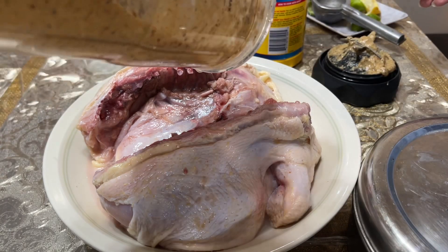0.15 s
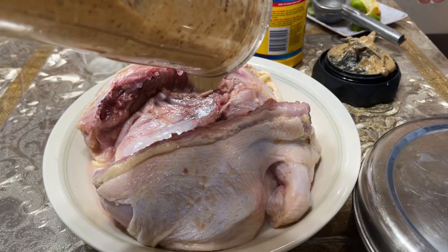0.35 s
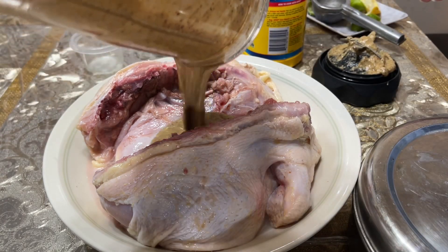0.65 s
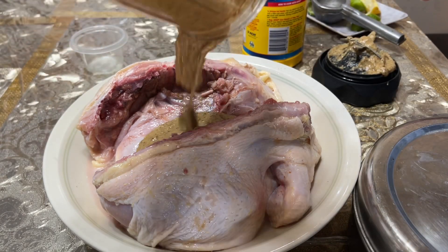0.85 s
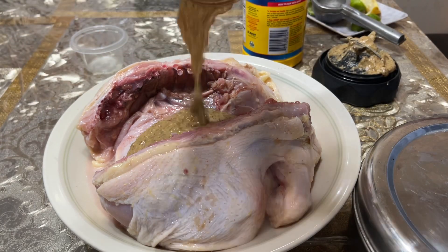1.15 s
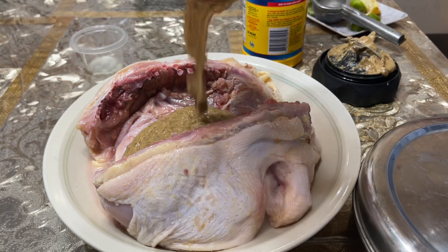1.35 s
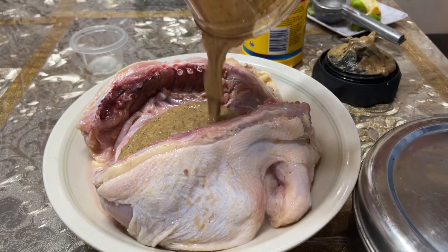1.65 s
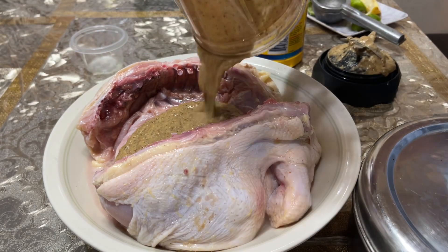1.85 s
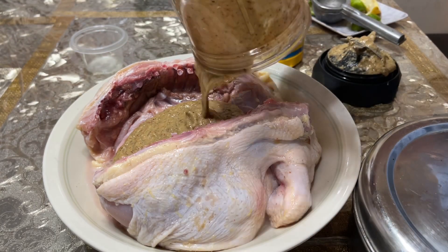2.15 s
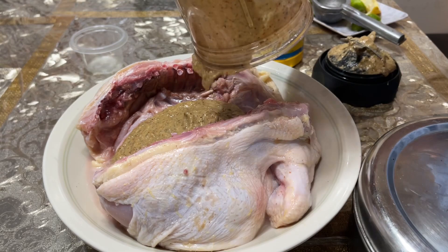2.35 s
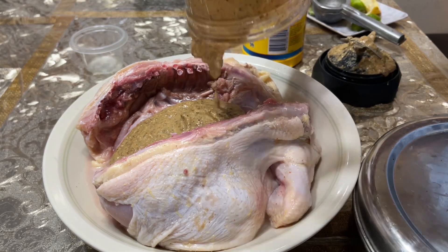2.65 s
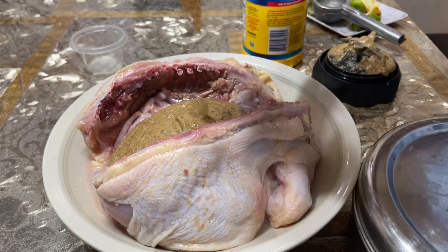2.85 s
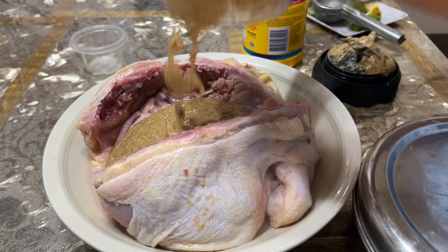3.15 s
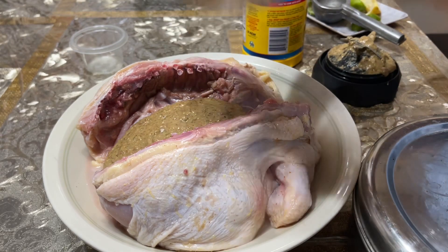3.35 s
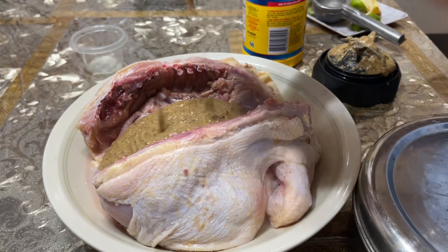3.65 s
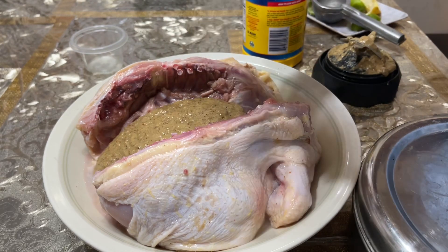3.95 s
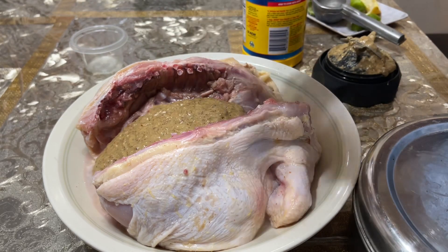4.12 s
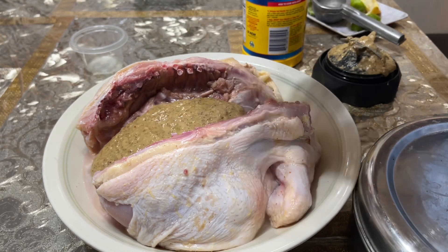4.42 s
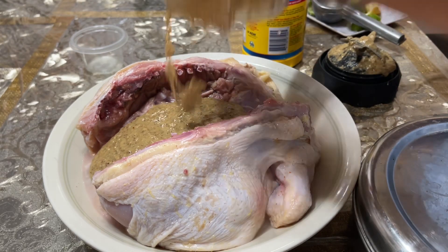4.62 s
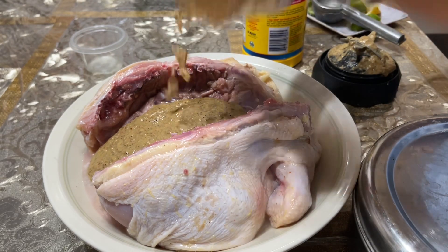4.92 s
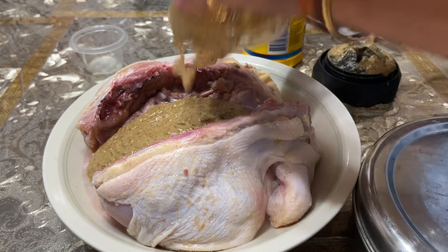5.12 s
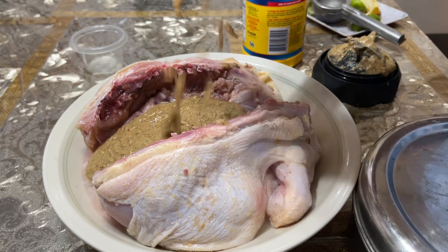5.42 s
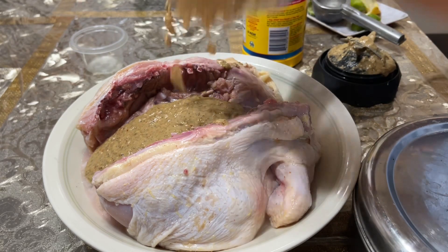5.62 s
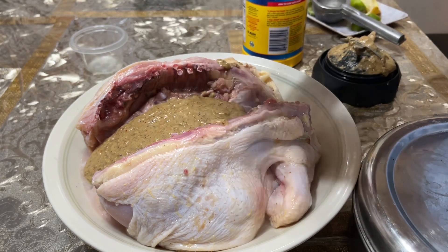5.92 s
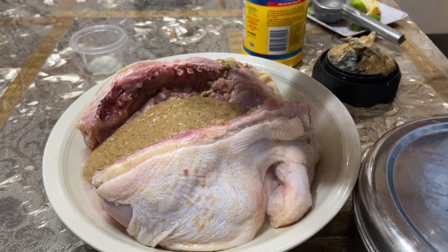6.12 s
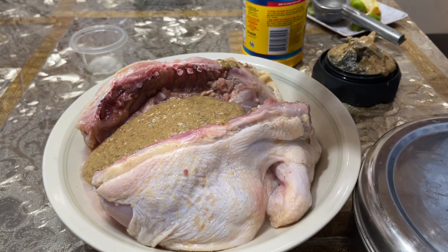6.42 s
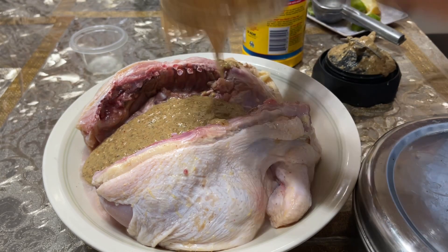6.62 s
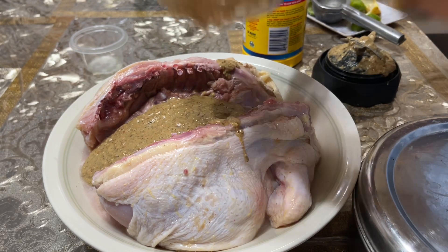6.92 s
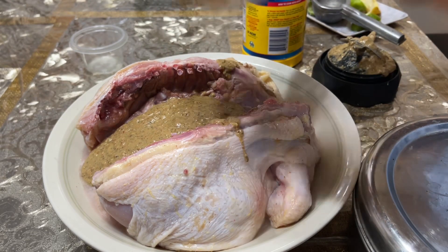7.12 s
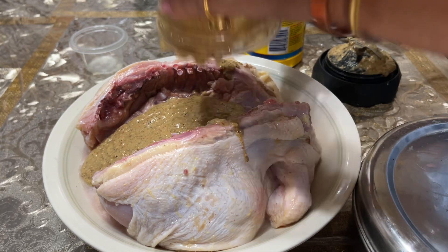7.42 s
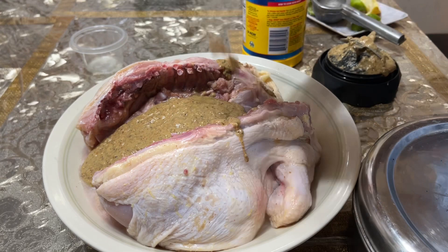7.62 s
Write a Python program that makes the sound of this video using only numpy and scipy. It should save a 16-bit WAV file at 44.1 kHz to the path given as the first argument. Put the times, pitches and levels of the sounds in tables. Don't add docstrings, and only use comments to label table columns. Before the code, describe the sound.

Wet paste ticks and a distant door thud, then bright glassy clinks and short scrapes in a jar, over fridge hum and passing traffic.

```python
import sys
import numpy as np
from scipy import signal
from scipy.fft import rfft, irfft, next_fast_len
from scipy.io import wavfile
from scipy.ndimage import uniform_filter1d

SR = 44100
rng = np.random.default_rng(int(sys.argv[2]) if len(sys.argv) > 2 else 0)


def natural_amplitude(level_db):
    exponent = np.asarray(level_db, float) / 20
    return 10 ** exponent


def bounce(signal):
    frames = np.transpose(np.atleast_2d(signal))
    limited = np.clip(frames, -1, 1)
    pcm = np.round(limited * 32767).astype(np.int16)
    wavfile.write(sys.argv[1], SR, pcm)


N = 342657


def evened(x):
    return x / np.sqrt(np.mean(x ** 2) + 1e-20)


def read(points, hz):
    f, value = np.transpose(points)
    return np.interp(np.log(hz + 1), np.log(f + 1), value)


def curve(rows):
    s, *columns = np.transpose(rows)
    return [np.interp(np.arange(N) / SR, s, column) for column in columns]


def add(mix, s, sound):
    part = mix[..., round(s * SR):][..., :sound.shape[-1]]
    part += sound[..., :part.shape[-1]]


# (frequency [Hz], likeness [0 to 1])
LIKENESS = [(60, 0.96), (150, 0.97), (380, 0.33), (950, 0.11), (2400, 0.27), (5500, 1), (7600, 0.083),
            (15000, 0.7)]
# (frequency [Hz], left over right [dB])
LEFT_LEAN = [(60, 1), (550, 1.5), (1650, 1.5), (5000, 6), (7800, 3.5), (15000, -3.5)]


def noise(spectrum, patchy_db):
    frames, hz = N // 512 + 5, np.fft.rfftfreq(2048, 1 / SR)
    a, b, c, d, patches = rng.standard_normal((frames, 1025, 5)).T
    patches = evened(uniform_filter1d(uniform_filter1d(patches, 12, 0), 8, 1))
    same = np.clip(read(LIKENESS, hz), -1, 1)[:, None]
    left, own = a + 1j * b, c + 1j * d
    right = natural_amplitude(-read(LEFT_LEAN, hz))[:, None] * (same * left + np.sqrt(1 - same ** 2) * own)
    z = np.array([left, right]) * natural_amplitude(read(spectrum, hz)[:, None] + patchy_db * patches)
    return evened(signal.istft(z, nperseg=2048, noverlap=1536)[1][:, :N])


def whistle(hz, width, steady):
    slow = signal.butter(2, width, fs=SR, output="sos")
    wander = signal.sosfilt(slow, rng.standard_normal((2, N)))
    wander = steady + evened(wander[0]) + 1j * evened(wander[1])
    phase = 2 * np.pi * np.cumsum(hz * np.ones(N)) / SR
    return evened((wander * np.exp(1j * phase)).real)


def ring(modes, factor, spread_db, rise_s):
    hz, db, t60 = np.transpose(modes)[:, :, None]
    t = np.arange(5000) / SR
    strength, detune, damping, beat = rng.standard_normal((4, len(modes), 1))
    db = db + spread_db * strength
    fade_s = np.minimum(t60 * factor * np.exp(0.2 * damping), 0.2)
    sines = natural_amplitude(db - 60 * t / fade_s) * np.sin(2 * np.pi * hz * (1 + 0.0026 * detune) * t)
    sines *= 1 + 0.6 * np.cos(2 * np.pi * 80 * beat * t)
    touch = (1 - np.exp(-t / rise_s)) * (0.42 + 0.31 * np.exp(-t / 0.0033))
    return sines.sum(0) * touch / np.sqrt((natural_amplitude(db) ** 2).sum())


def crack(hz, width, decay_s, rise_s):
    t = np.arange(3000) / SR
    edges = np.clip([hz - width / 2, hz + width / 2], 200, 16700)
    band = signal.butter(2, edges, "band", fs=SR, output="sos")
    burst = signal.sosfilt(band, rng.standard_normal(3500))[500:]
    burst = burst * np.exp(-t / decay_s) * (1 - np.exp(-t / rise_s))
    return burst / np.sqrt(2 * uniform_filter1d(burst ** 2, 40).max())


# (frequency [Hz], level [dB per Hz])
ROOM_COLOUR = [(20, -32), (44, -8), (86, -5.5), (182, -14.5), (388, -21.5), (760, -24), (2000, -34.5),
               (3700, -51), (9000, -46.5), (12000, -47), (12600, -67)]


def room_tone():
    return natural_amplitude(-59 - 1.0) * noise(ROOM_COLOUR, patchy_db=2.0)


# (frequency [Hz], level [dB])
FRIDGE_NOTES = [(177.6, -71), (238, -71.5), (721, -78.5), (958, -84)]


def fridge():
    return sum(natural_amplitude(db) * whistle(hz, 2.5, 3.6) for hz, db in FRIDGE_NOTES)


# (frequency [Hz], level [dB per Hz])
TYRE_COLOUR = [(100, -7), (235, -12), (422, -16.5), (602, -8.5), (829, -13.5), (956, -8.5), (1630, -20.5),
               (4990, -33.5), (7000, -34.5), (9100, -70.5)]
# (time [s], nearness [dB])
VEHICLE_NEARNESS = [
    (0, -15.5),
    (1.45, -12.5),
    (2.5, -5),
    (3.5, 0),
    (4.4, -4.5),
    (5.5, -4.5),
    (6.3, -10.5),
    (7.77, -11),
]
# (time [s], pitch [Hz], level [dB])
ENGINE_NOTE = [(0, 80.12, -60), (.45, 85.7, -60.5), (.95, 76.4, -64.5), (2.1, 84, -55.5), (2.7, 88, -58.5),
               (3.3, 75.8, -62), (3.7, 73, -57.5), (4.7, 74.5, -62), (5.5, 63, -61.5), (7.77, 58.1, -75)]


def vehicle():
    lag_s = 0.7
    near_db, = curve(VEHICLE_NEARNESS)
    late_db, = curve([(s + lag_s, db) for s, db in VEHICLE_NEARNESS])
    engine_hz, engine_db = curve(ENGINE_NOTE)
    wash = natural_amplitude(-54 + 1.344 * near_db) * noise(TYRE_COLOUR, patchy_db=2.0)
    rumble_colour = [(30, -24.5), (60, -7.0), (150, -2.5), (260, -2.0), (330, -27.5), (600, -54.5)]
    rumble = natural_amplitude(-55 + 1.2 * late_db) * noise(rumble_colour, patchy_db=2.5)
    return wash + rumble + natural_amplitude(engine_db) * whistle(engine_hz, 2.8, 0.86)


# (time [s], level [dB], length [s])
NEAR_CALLS = [(.05, -75, .03), (.18, -71.5, 0.022), (.268, -66.5, 0.019), (0.794, -67, 0.012),
              (.835, -76, 0.019), (2.0, -75, 0.058), (5.85, -77, 0.056), (6.1, -80.5, 0.033),
              (6.21, -67.5, 0.032), (6.42, -90.5, .03), (7.27, -84, 0.026), (7.4, -79, .04)]


def crickets():
    t = np.arange(N) / SR
    near = sum(natural_amplitude(db) * np.exp(-0.5 * ((t - s) / length) ** 2) for s, db, length in NEAR_CALLS)
    near = near * whistle(4935 - 140 * np.exp(-t / 0.08), 23, 0.9)
    chorus = natural_amplitude(-82) * np.array([whistle(4925, 62, 0.1), whistle(4925, 59.5, 0.1)])
    pulse = signal.sosfilt(signal.butter(2, 6.0, fs=SR, output="sos"), rng.standard_normal(N))
    chorus = chorus * natural_amplitude(1.7 * evened(pulse) - 0.6)
    return (chorus + near) * natural_amplitude([[3.0], [-3.0]])


# (time [s], level [dB], centre [Hz])
PASTE_SMACKS = [(0.1468, -62.5, 4370), (.626, -64.5, 5100), (2.6104, -48, 8850), (3.6023, -51, 8900),
                (.687, -68, 3560), (1.4901, -46, 6670), (1.5613, -41, 6270), (3.983, -58, 6400),
                (4.5149, -50.5, 6500), (5.536, -49.5, 7500), (5.981, -50.5, 5920), (6.107, -67, 6400),
                (6.265, -68, 6470), (6.5863, -52, 6400), (6.6986, -56, 7060), (7.1447, -53, 5900),
                (7.6889, -54.5, 6750)]
# (time [s], level [dB], low part [dB])
PASTE_TICKS = [(0.4383, -62, -10), (0.4447, -57.5, -23), (0.449, -52, -8.5), (0.923, -63.5, 6.5),
               (0.9254, -58, -25), (0.942, -53.5, -7), (1.0748, -57, -3), (1.0976, -46, -13),
               (1.2585, -52.5, -11), (1.3182, -53.5, -10), (1.4175, -49.5, -12), (1.431, -58, -5),
               (1.9542, -59, 6.5), (2.7783, -60, -1), (3.8654, -50, -6), (4.1175, -61.5, -15),
               (4.2742, -40, -5.5), (5.008, -51, -13), (5.041, -58.5, 5.5), (5.79, -55, -15),
               (5.82, -62, -17), (6.72, -61, -20), (6.9, -70, -22), (7.1505, -56, -25),
               (5.4272, -42.5, -16.5), (5.8419, -60, -24), (5.8647, -53.5, 2.5), (6.0265, -54.5, -23),
               (7.181, -53, -29)]
# (time [s], level [dB], pitch [Hz], fade by 60 dB [s])
BOWL_PLOPS = [
    (2.09, -46, 1250, 0.034),
    (4.2755, -36.5, 630, 0.017),
    (4.275, -41.5, 1510, .03),
]


def paste():
    out, t = np.zeros(N), np.arange(2500) / SR
    tick_hz = 9100
    rows = [(s, db, tick_hz, low_db) for s, db, low_db in PASTE_TICKS]
    rows += [(s, db, hz, -12) for s, db, hz in PASTE_SMACKS]
    for s, db, hz, low_db in rows:
        snap = crack(hz, 0.5 * hz, 0.00081 * (tick_hz / hz) ** 2, 0.0002)
        snap += natural_amplitude(-16.5 - 4.0 * (tick_hz - hz) / 1000) * crack(12000, 11000, 0.0011, 0.0003)
        low = natural_amplitude(low_db - 1.5) * crack(2800, 4900, 0.0023, 0.00043)
        add(out, s, natural_amplitude(db + 2.5) * (snap + low))
    for s, db, hz, t60 in BOWL_PLOPS:
        note = np.sin(2 * np.pi * hz * t) * (1 - np.exp(-t / 0.0019))
        add(out, s, natural_amplitude(db - 60 * t / t60) * note)
    return out


# (frequency [Hz], level
# [dB], fade by 60 dB [s])
LOW_NOTES = [(1420, -9, 0.12), (1880, -13, 0.09), (2650, -9, 0.11), (3190, -11, 0.04), (3360, -9, 0.09),
             (3800, -13, .04), (4360, -10, 0.05), (4700, -11, .03), (5090, 1, 0.08), (5570, -4, 0.04),
             (5880, 0, .055), (6300, -8, 0.03)]
MIDDLE_NOTES = [(8460, -4, .04), (8820, 1.5, .036), (8960, -4, .015), (9120, -6, .03)]
TOP_NOTES = [(10750, -13, .03), (11140, -8, .035), (11400, -9, .04), (11930, 0, .032), (12230, -8, .03)]
# (frequency [Hz], level [dB], fade by 60 dB [s])
WALL_NOTES = [(5090, -9, .08), (7770, 0, .07), (8050, -11, .035), (9460, -5, .045), (9900, -10, .03),
              (12800, -1, .055)]


def strike(db, low_db, top_db, wall_db):
    factor = 0.99 + 0.0032 * (db + 28.0)
    out = natural_amplitude(low_db + 6.5) * ring(LOW_NOTES, 0.97 * factor, spread_db=4.0, rise_s=0.0007)
    out += natural_amplitude(db + 0.5) * ring(MIDDLE_NOTES, factor, spread_db=1.5, rise_s=0.00027)
    out += natural_amplitude(top_db + 7.0) * ring(TOP_NOTES, factor, spread_db=8.0, rise_s=0.00022)
    out += natural_amplitude(wall_db + 6.0) * ring(WALL_NOTES, factor, spread_db=4.5, rise_s=0.0004)
    add(out, 0, natural_amplitude(top_db - 4) * crack(14800, 3500, 0.0006, 0.00027))
    add(out, 0, natural_amplitude(db - 14) * crack(11000, 6000, 0.0058, 0.0005))
    add(out, 0, natural_amplitude(low_db - 8.5) * crack(5100, 4700, 0.011, 0.0004))
    return out


# (time [s], middle notes [dB], low
# notes [dB], top notes [dB], wall notes [dB])
LIGHT_TOUCHES = [(1.6252, -37.5, -59, -63, -56.5), (1.6424, -45, -62, -64, -63),
                 (3.0184, -53, -59, -62, -61), (3.041, -48, -56, -57, -55), (3.0769, -51.5, -62, -66, -71),
                 (3.1476, -37, -55, -45, -52), (3.1663, -48, -57.5, -56, -66),
                 (3.192, -42, -61, -49.5, -64), (3.739, -43.5, -61.5, -40, -61),
                 (4.185, -46, -56.5, -63, -57), (4.2455, -47, -55.5, -50, -53),
                 (4.5177, -36.5, -53.5, -50.5, -50.5), (4.672, -38, -63.5, -44, -58),
                 (4.7017, -56, -71, -63, -65), (4.7144, -62.5, -71.5, -60, -75),
                 (4.7329, -54, -69.5, -64, -79), (4.7521, -61, -74, -81, -68),
                 (4.9593, -38.5, -59.5, -39.5, -66), (4.967, -38, -59, -44, -64),
                 (5.094, -47, -59, -66, -71), (5.293, -35, -60, -53, -65), (5.7646, -52, -58, -62, -62),
                 (3.4256, -37, -57, -53, -60), (3.634, -48, -67, -62, -74), (3.7653, -43.5, -62, -52, -64),
                (4.79, -53, -64, -64, -68), (4.8534, -42, -58, -47, -64), (4.868, -41, -55, -46, -54),
                (5.354, -39, -61, -60, -65)]
# (time [s], middle notes [dB], low notes [dB], top notes [dB], wall notes [dB])
FIRM_BLOWS = [(2.811, -19, -41.5, -28.5, -28.5), (2.831, -18.5, -51.5, -40.5, -36),
              (2.8439, -33, -54, -44, -43), (3.1241, -26.5, -45, -38, -52),
              (3.4458, -20, -41, -21.5, -38.5), (3.462, -25, -47, -32.5, -38),
              (3.6504, -25.5, -57, -29.5, -54.5), (3.6533, -32, -48.5, -34, -56.5),
              (3.662, -27.5, -55, -52, -56), (3.678, -29, -48, -29, -52.5),
              (3.6866, -26.5, -56.5, -33, -55), (3.691, -26, -48.5, -46, -54),
              (3.6977, -29.5, -55, -48, -51.5), (3.7273, -22, -45, -37, -55.5),
              (3.7831, -17.5, -42, -26.5, -31.5), (3.8062, -28, -50.5, -47.5, -59),
              (4.2063, -28.5, -47, -38, -44.5), (4.2287, -20.5, -47.5, -34.5, -34),
              (4.2393, -22.5, -49.5, -35.5, -40), (4.3086, -37.5, -58.5, -41, -56),
              (4.3139, -33.5, -60, -55, -63), (4.5461, -25, -46.5, -41, -42), (4.5842, -13, -37, -26, -26),
              (4.6008, -22.5, -46, -42, -34), (4.7959, -37.5, -63.5, -47.5, -54.5),
              (4.8025, -38.5, -53.5, -42, -46), (4.841, -24, -44, -34, -40),
              (4.879, -13.5, -37.5, -28, -30), (4.8944, -29.5, -52, -36, -39),
              (5.1455, -11.5, -38.5, -23.5, -31), (5.158, -22.5, -48, -40.5, -47),
              (5.276, -30, -57, -31.5, -56), (5.2865, -29, -52.5, -37, -57),
              (5.3857, -21, -39.5, -28.5, -29.5), (5.6197, -22.5, -40.5, -31, -30)]


def jar():
    out = np.zeros(N)
    for s, *levels_db in FIRM_BLOWS + LIGHT_TOUCHES:
        add(out, s, strike(*levels_db))
    return out


# (frequency [Hz], level [dB per Hz])
DOOR_RATTLE = [(60, -34), (110, 0), (150, -4), (330, -12), (1000, -21.5), (2500, -29.5), (7000, -60)]


def door():
    seconds = np.arange(N) / SR
    since = seconds - 1.712
    slam = natural_amplitude(-34.5) * np.cos(2 * np.pi * 50 * since) * np.exp(-0.5 * (since / 0.0065) ** 2)
    t = np.maximum(seconds - 1.68, 0)
    boom = evened(whistle(36, 6, 3) + whistle(53, 4, 4))
    swell = np.minimum(t / 0.034, 1) * natural_amplitude(-43 - 44.5 * np.maximum(t - 0.2, 0))
    slowing_s = 0.3
    fade_db = 45.5 * slowing_s * np.log1p(t / slowing_s)
    rattle = np.minimum(t / 0.057, 1) ** 2 * natural_amplitude(-47.5 - fade_db)
    return slam + swell * boom + rattle * noise(DOOR_RATTLE, patchy_db=0.0)


# (time [s], level [dB], pitch [Hz], fade by 60 dB [s])
HIGH_RINGS = [
    (3.1235, -40, 15600, .07),
    (3.727, -32, 15400, .03),
    (4.52, -42, 14800, .02),
    (4.5845, -26, 14900, .02),
    (4.805, -42, 14600, .03),
    (5.386, -29, 14700, .11),
]


def shimmers():
    out = np.zeros(N)
    for s, db, hz, t60 in HIGH_RINGS:
        pair = [(hz - 250, -3, t60), (hz + 250, -3, t60)]
        add(out, s, natural_amplitude(db) * ring(pair, 0.99, spread_db=-0.5, rise_s=0.0004))
    return out


# (start [s], length [s], level [dB])
WALL_DRAGS = [
    (3.396, 0.075, -70.5),
    (3.635, 0.14, -58.5),
    (4.157, 0.13, -66),
    (4.507, 0.13, -70.5),
    (4.77, 0.28, -69.5),
    (5.315, 0.15, -68.5),
]


def drag():
    t = np.arange(N) / SR
    stroke = np.zeros(N)
    for s, length, db in WALL_DRAGS:
        stroke += natural_amplitude(db) * np.sqrt(np.clip(1 - (2 * (t - s) / length - 1) ** 2, 0, 1))
    slips_per_s, spread_db = 430, 4
    strength = natural_amplitude(spread_db * np.minimum(rng.exponential(1, N), 4))
    slips = stroke * strength * (rng.random(N) < slips_per_s / SR)
    place = rng.integers(0, 4, N)
    out = np.zeros(N)
    for k in range(4):
        knock = strike(0, -3.0, -8.5, -14.5) * np.exp(-t[:5000] / 0.0047)
        out += signal.oaconvolve(slips * (place == k), knock)[:N]
    return out


# (time [s], blow [dB], lower notes [dB], top note [Hz])
TIP_TAPS = [(3.3968, -51.5, -58, 11200), (5.329, -49, -57, 11300), (5.51, -42, -52, 11100),
            (5.5307, -49, -66, 11200), (5.541, -52, -65, 11410), (5.7264, -45, -59, 11100),
            (5.743, -46, -50.5, 11100), (5.8057, -61, -68, 11100), (5.937, -45, -53, 11100),
            (5.951, -45.5, -54, 11100), (6.177, -55.5, -62, 11100), (6.6212, -44, -48.5, 11100),
            (6.6867, -59, -57, 10800), (6.774, -54.5, -54.5, 10900), (6.789, -45.5, -58, 11040),
            (6.95, -36.5, -43, 11070), (6.958, -39, -51, 11170), (7.0281, -50, -58, 11100),
            (7.189, -52, -51.5, 10860), (7.211, -51, -61, 11100), (7.2544, -48.5, -65, 10950),
            (7.3522, -50, -70, 11100), (7.4455, -52, -62, 11100), (7.4537, -43, -54, 11020),
            (7.565, -60, -64, 11200), (7.6064, -44.5, -66, 11200), (7.655, -65, -68, 11100),
            (7.7147, -55, -69, 11100), (7.7382, -47, -59.5, 11160), (7.7432, -49, -66, 11140)]
# (frequency [Hz], level [dB], fade by 60 dB [s])
TIP_LOW_NOTES = [(5870, -8, 0.037), (6430, -9.5, 0.013), (6750, -6, 0.016), (7270, 0.5, 0.23),
                 (7880, -8.5, .03), (8300, -2, 0.049)]
TIP_TOP_NOTES = [(11500, -8, .03), (10995, 9, 0.078), (11100, 4.5, 0.051), (11800, -12.5, 0.023),
                 (12200, -10.5, 0.045)]


def tip():
    out = np.zeros(N)
    for s, db, low_db, hz in TIP_TAPS:
        top = [(f * hz / 11060, note_db, t60) for f, note_db, t60 in TIP_TOP_NOTES]
        add(out, s, natural_amplitude(db + 2.0) * ring(top, 1.0, spread_db=5.0, rise_s=0.000057))
        add(out, s, natural_amplitude(low_db - 2.0) * ring(TIP_LOW_NOTES, 0.79, spread_db=4.5, rise_s=0.00083))
        add(out, s, natural_amplitude(db - 14.0) * crack(hz, 3000, 0.005, 0.00033))
        add(out, s, natural_amplitude(low_db - 2.5) * crack(7840, 3500, 0.0063, 0.00038))
    return out


# (time [s], level [dB])
RIM_HIT = [
    (5.904, -26.5),
]
# (frequency [Hz], level [dB], fade by 60 dB [s])
RIM_NOTES = [(1910, -7, .085), (2640, -17, .05), (3500, -19, .04), (4390, -11, .05), (5200, -15, .04),
             (5960, 0, .055), (6260, -16, .03), (7480, -14, .04), (7810, 1.5, .055), (8860, -15, .03),
             (9680, -8, .04), (11500, -11, .03), (11990, -11, .03)]


def rim():
    out = np.zeros(N)
    for s, db in RIM_HIT:
        add(out, s, natural_amplitude(db + 1.0) * ring(RIM_NOTES, 1.74, spread_db=3.0, rise_s=0.0012))
        add(out, s, natural_amplitude(db - 23.5) * crack(3500, 7000, 0.0091, 0.00022))
        add(out, s, natural_amplitude(db - 1.0) * crack(11800, 7000, 0.0014, 0.00026))
    return out


# (frequency [Hz], fade by 60 dB [s])
ECHO_FADE = [(500, 0.31), (2000, 0.34), (6000, 0.16), (9000, 0.31), (13000, 0.13)]


def kitchen(x):
    taps = np.zeros((2, 20000))
    at = np.arange(160, 19980, 20) + rng.integers(0, 20, (2, 991))
    np.put_along_axis(taps, at, rng.choice([-1., 1.], at.shape), 1)
    hz, t, z = signal.stft(taps, SR, nperseg=128)
    same = np.clip(0.36 * read(LIKENESS, hz), -1, 1)[:, None]
    z = np.array([z[0], same * z[0] + np.sqrt(1 - same ** 2) * z[1]])
    fade = natural_amplitude(-60 * t / read(ECHO_FADE, hz)[:, None])
    tail = signal.istft(z * fade, SR, nperseg=128)[1]
    return signal.fftconvolve(x[None], tail / np.linalg.norm(tail[0]), axes=1)[:, :N]


def leaning(x, points):
    size = next_fast_len(N)
    half = natural_amplitude(read(points, np.fft.rfftfreq(size, 1 / SR)) / 2)
    return irfft(rfft(x, size) * np.array([half, 1 / half]), size)[:, :N]


def scene():
    background = room_tone() + fridge() + vehicle() + crickets() + door()
    wet = paste()
    near = jar() + shimmers() + drag() + tip() + rim()
    direct = leaning(near, [(1900, 0.47), (2650, 4.3), (3400, 3.4), (5000, 0.3), (7000, 0.99), (7700, 0.4)])
    direct += leaning(wet, [(1500, 3.2), (3000, 5.2), (5500, 11.7), (7200, 1.8), (7800, 0.4)])
    echoes = kitchen(natural_amplitude(-20.5) * near + natural_amplitude(-6.5) * wet)
    return direct + echoes + background


def hushed(x):
    hz, t, z = signal.stft(np.array([x[0] + x[1], x[0] - x[1]]) / 2, SR, nperseg=1024)
    band = np.arange(len(hz)) // 16
    power = np.add.reduceat(abs(z) ** 2, np.arange(0, len(hz), 16), axis=1)[:, band]
    hiss = np.median(power[0, abs(hz - 11300) < 300])
    loudest = power[:, hz > 7000].max((0, 1))
    weak = abs(hz[:, None] - 10200) < 450
    top = hz[:, None] > 13400
    limit = hiss * natural_amplitude(2 * (-16.5 + 15 * weak + 22 * top)) + loudest * natural_amplitude(2 * -39.0)
    keep = np.where(hz[:, None] > 8000, 1 / (1 + (limit / (power + 1e-30)) ** 4), 1)
    mid, side = signal.istft(z * keep, SR, nperseg=1024)[1][:, :N]
    return np.array([mid + side, mid - side])


def low_pass(x):
    return signal.sosfilt(signal.butter(12, 16800, fs=SR, output="sos"), x)


# (frequency [Hz],
# left leads by [radians])
LEFT_LEAD = [(1500, .1), (2650, .6), (3400, .2), (5100, .8), (5900, .3), (7750, 1.1), (8800, -.5),
             (9470, -1.85), (11000, -4.4), (11950, -6.2), (12800, -7.7), (16800, -15)]


def record(dry):
    size = next_fast_len(N)
    hz = np.fft.rfftfreq(size, 1 / SR)
    lead = np.interp(hz, *np.transpose(LEFT_LEAD)) / 2
    colour = natural_amplitude(read([(12900, 0.0), (13900, -22), (14700, -13), (16000, -18), (17000, -39)], hz))
    shift = np.exp(1j * np.array([lead, -lead]))
    shifted = irfft(rfft(dry, size, axis=1) * colour * shift, size, axis=1)[:, :N]
    mix = hushed(shifted)
    return low_pass(mix)


dry = scene()
out = record(dry)
bounce(out)
```